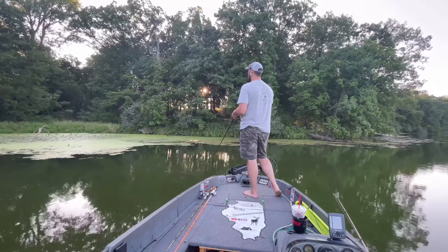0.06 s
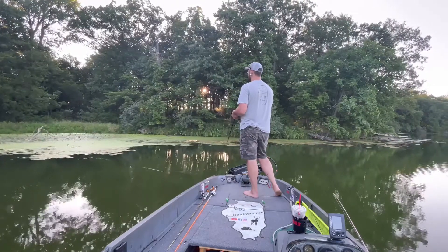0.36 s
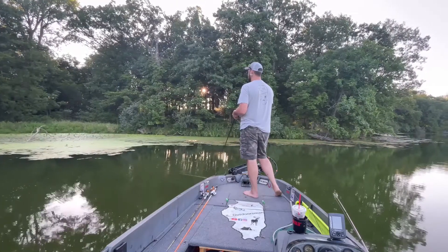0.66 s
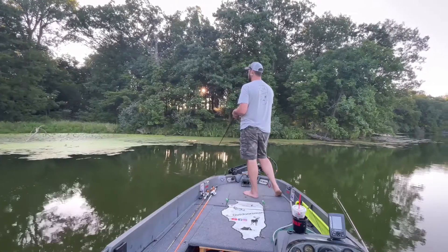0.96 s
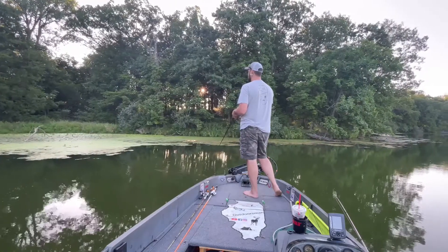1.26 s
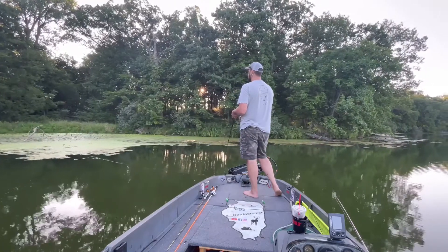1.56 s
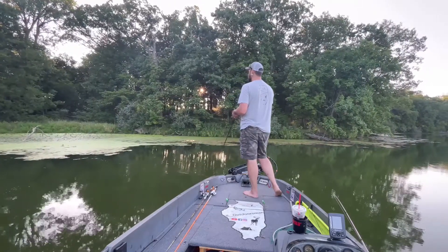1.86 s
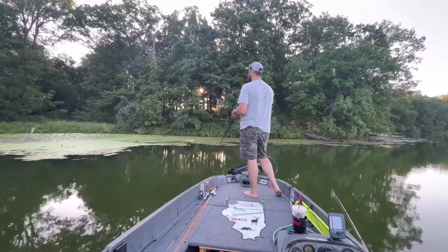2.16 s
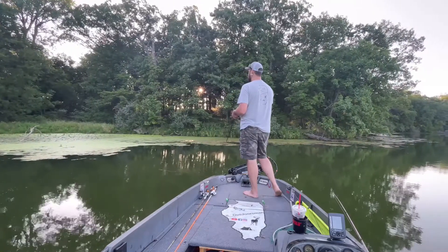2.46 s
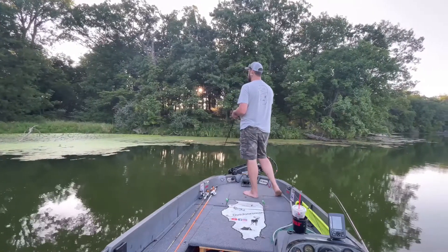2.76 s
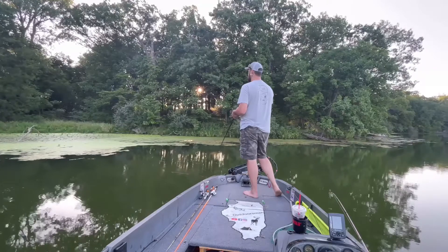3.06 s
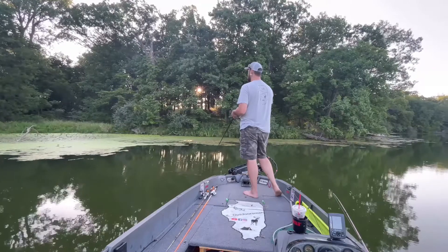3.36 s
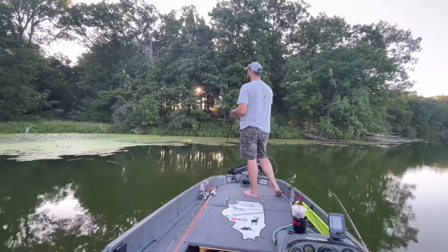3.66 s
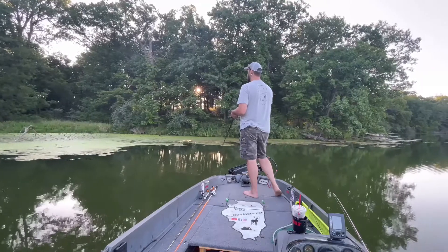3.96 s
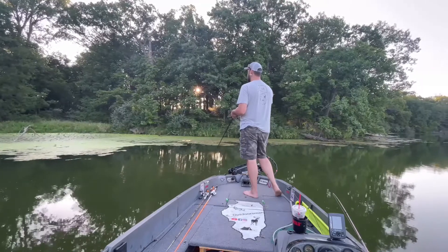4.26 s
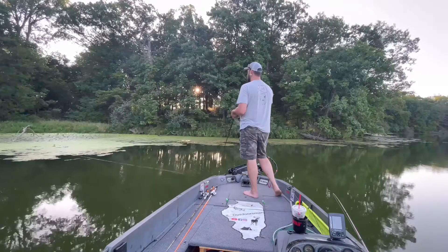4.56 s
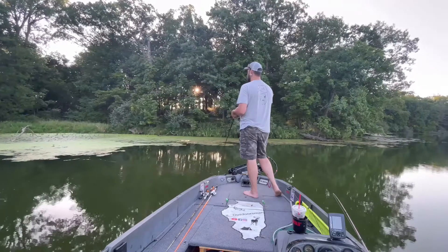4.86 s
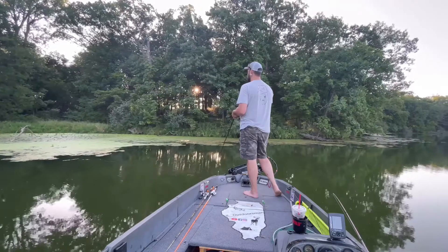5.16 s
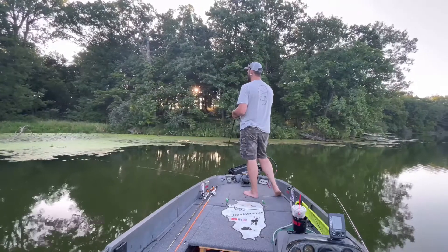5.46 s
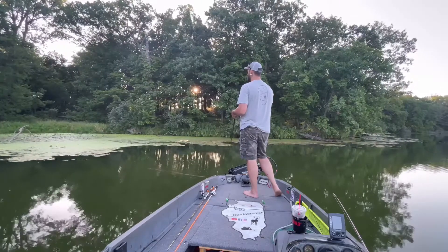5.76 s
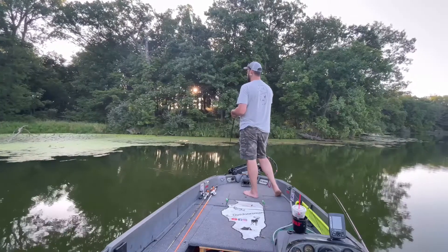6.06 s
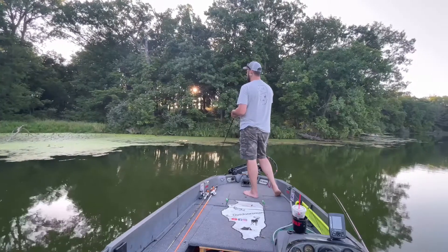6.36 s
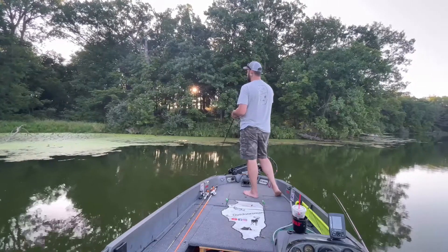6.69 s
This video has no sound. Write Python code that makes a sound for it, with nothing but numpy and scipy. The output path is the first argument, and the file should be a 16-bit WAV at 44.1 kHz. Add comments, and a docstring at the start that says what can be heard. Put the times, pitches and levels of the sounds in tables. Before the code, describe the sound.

Birds whistle over a high insect drone and faint far motor hum, while a fishing reel winds and clicks close by.

```python
"""Fishing on a summer evening

Under a soft rumble of air, a far motor hums across the lake and low hoots sound. Insects drone in
the trees, one cricket chirps evenly, and birds whistle from the wooded shore, which echoes them.
Close by in the boat, an angler winds his reel in short turns: gear teeth and line rasp, the ratchet
ticks and the tackle clicks."""
import sys
import numpy as np
from scipy import signal
from scipy.fft import rfft, irfft
from scipy.io import wavfile
from scipy.ndimage import uniform_filter1d

SR = 44100
rng = np.random.default_rng(int(sys.argv[2]) if len(sys.argv) > 2 else 0)


def digitize_waveform(pressure):
    """Quantize a signal to 16-bit integers and store it at the path in sys.argv[1].

    Rows of a 2-D input are taken as channels; values are limited to [-1, 1].
    """
    field = np.atleast_2d(pressure).T
    bounded = np.clip(field, -1, 1)
    quanta = np.round(bounded * 32767).astype(np.int16)
    wavfile.write(sys.argv[1], SR, quanta)


N = 305596
TIME = np.arange(N) / SR


def gain_of(db):
    """Decibels to amplitude."""
    return 10 ** (np.asarray(db) / 20)


def unit_rms(x):
    """Scales to an rms of one."""
    return x / np.sqrt(np.mean(x ** 2) + 1e-20)


def eq_gain(curve, hz):
    """The gain of an EQ curve at hz, read on a log-frequency axis."""
    freq_hz, level_db = np.transpose(curve)
    return gain_of(np.interp(np.log(hz + 1), np.log(freq_hz + 1), level_db))


def add(mix, start_s, sound):
    """Lays a sound into the mix, no earlier than time zero."""
    part = mix[max(round(start_s * SR), 0):][:len(sound)]
    part += sound[:len(part)]


def coloured(x, gain):
    """Filters x by a gain that is a function of frequency."""
    return irfft(rfft(x) * gain(np.fft.rfftfreq(len(x), 1 / SR)), len(x))


def noise(gain):
    """Noise of rms one with the given spectrum."""
    return unit_rms(coloured(rng.standard_normal(N), gain))


def drift(rate_hz):
    """A random modulator, mostly slower than rate_hz."""
    return noise(lambda f: np.exp(-(f / rate_hz) ** 2))


def bell(f, hz, width):
    """A band around hz, half the power at the edges of its width."""
    return 2 ** (-2 * ((f - hz) / width) ** 2)


def shore(dry, t60_s, wet_db, predelay_s=0.019, echoes_per_s=2000):
    """Trunks and leaves scatter a sound into many late, weak echoes."""
    t = np.arange(SR) / SR
    echoes = rng.standard_normal(SR) * (rng.random(SR) < echoes_per_s / SR)
    echoes *= (t > predelay_s) * gain_of(-60 * t / t60_s)
    return dry + gain_of(wet_db) * signal.fftconvolve(dry, echoes / np.linalg.norm(echoes))[:N]


# Tone of the air over the lake: freq_hz, gain_db
AIR_EQ = [(12, -41), (20, -4), (50, -4), (80, 4), (97, -2.5), (122, -1.5), (142, -7.5), (200, -6.5),
          (232, -12.5), (275, -13.5), (400, -17.5), (500, -19), (717, -23.5), (1220, -32.5), (3150, -38),
          (4800, -38), (6000, -32.5), (7930, -39.5), (16000, -41)]


def air(level_db=-50, sway_db=1.1, sway_hz=1.85, rise_db_per_s=0.13, crossover_hz=300):
    """A low rumble that sways and slowly grows, under a smooth hiss."""
    bed = gain_of(level_db) * noise(lambda f: eq_gain(AIR_EQ, f))
    rumble = coloured(bed, lambda f: 1 / (1 + (f / crossover_hz) ** 4))
    hiss = bed - rumble
    swell_db = rise_db_per_s * (TIME - TIME.mean()) + sway_db * drift(sway_hz)
    return rumble * gain_of(swell_db) + hiss


def whine(pitch_hz=12023, level_db=-84, waver_db=1.2):
    """A thin high tone whose level wavers a little."""
    return gain_of(level_db + waver_db * drift(4)) * np.sqrt(2) * np.sin(2 * np.pi * pitch_hz * TIME)


# Faint far drones: start_s, end_s, pitch_hz, width_hz, level_db
DRONES = [(0.6, 3.6, 116, 2.6, -60.5), (2.5, 3.7, 129, 5.5, -59.5), (-0.5, 4.2, 217, 2.9, -62.5),
          (-0.5, 8, 163, 5.8, -63), (-2.5, 8, 176, 7.9, -63), (0.5, 4.2, 320, 6.1, -73.5)]


def drones():
    """Narrow bands of low noise hum in the distance, each fading in and out."""
    out = np.zeros(N)
    for start_s, end_s, pitch_hz, width_hz, level_db in DRONES:
        along = np.clip((TIME - start_s) / (end_s - start_s), 0, 1)
        fade = np.sqrt(abs(np.sin(np.pi * along)))
        out += gain_of(level_db) * fade * noise(lambda f: bell(f, pitch_hz, width_hz))
    return out


# Swells where the motor carries better across the water: peak_s, half_length_s, level_db
MOTOR_SWELLS = [(.8, .3, -56.5), (3.18, 0.3, -50.5), (5.33, 0.1, -50.5), (5.853, 0.28, -57),
                (6.62, .35, -51)]


def motor(pitch_hz=108.4, floor_db=-61, slows_at_s=5.4, sag_hz_per_s=3.6, waver_hz=1.44, waver_db=1.0):
    """The firing tone of a far motor runs steadily, then sinks as the motor slows."""
    hz = pitch_hz - sag_hz_per_s * np.maximum(TIME - slows_at_s, 0)
    cycles = np.cumsum(hz + waver_hz * drift(4.43)) / SR
    power = gain_of(floor_db) ** 2
    for peak_s, half_length_s, level_db in MOTOR_SWELLS:
        power += gain_of(level_db) ** 2 * np.exp(-((TIME - peak_s) / half_length_s) ** 2)
    return np.sqrt(2 * power) * gain_of(-waver_db * drift(5.3)) * np.sin(2 * np.pi * cycles)


# Runs of soft, far hoots: start_s, count, period_s, pitch_hz, level_db, fade_db_per_hoot
HOOT_RUNS = [(-.045, 8, .195, 300, -56, 0.65), (3.38, 6, .127, 313.4, -57.5, 0.6)]


def hoots(detune_hz=1.35, duty=.78):
    """Evenly spaced hoots, each a plain tone that swells and fades, softer than the last."""
    out = np.zeros(N)
    for start_s, count, period_s, pitch_hz, level_db, fade_db in HOOT_RUNS:
        t = np.arange(0, duty * period_s, 1 / SR)
        envelope = np.sin(np.pi * t / t[-1])
        for k in range(count):
            hz = pitch_hz + detune_hz * rng.standard_normal()
            tone = np.sqrt(2) * np.sin(2 * np.pi * (hz * t + rng.random()))
            add(out, start_s + k * period_s, gain_of(level_db - k * fade_db) * envelope * tone)
    return out


# Bands of the insect chorus: pitch_hz, width_hz, gain_db
INSECT_BANDS = [(5325, 406, -2), (5580, 270, 2.5), (5850, 190, 0), (6070, 220, 0.5), (6360, 250, 1.5),
                (6810, 270, -1.5), (6720, 130, -5.5), (6840, 210, -10), (7285, 92, -2.5),
                (7700, 480, -19.5)]


def insects(level_db=-64, flutter_db=.5):
    """Many wings blur into one narrow band for each kind of insect."""
    def spectrum(f):
        return np.sqrt(sum((gain_of(db) * bell(f, hz, width)) ** 2 for hz, width, db in INSECT_BANDS))
    return noise(spectrum) * gain_of(level_db + flutter_db * drift(40))


# Fader curve of the cricket: time_s, level_db
CRICKET_FADER = [(0, -69), (1.5, -70.5), (3, -67.7), (4.6, -65.3), (6.93, -66.7)]


def cricket(first_s=.118, period_s=.18965, length_s=0.05, jitter_s=0.0035, top_hz=6835, bend_hz=210):
    """Even chirps, each a tone that slides up to the wing's pitch and sags a little."""
    out, along = np.zeros(N), np.linspace(0, 1, round(length_s * SR))
    bend = bend_hz * ((along - .65) / 0.683) ** 2
    for centre_s in np.arange(first_s, N / SR, period_s):
        hz = top_hz + 15 * rng.standard_normal() - bend
        chirp = np.sin(np.pi * along) * np.sin(2 * np.pi * np.cumsum(hz) / SR)
        add(out, centre_s - length_s / 2 + jitter_s * rng.standard_normal(), chirp)
    return np.sqrt(2) * out * gain_of(np.interp(TIME, *np.transpose(CRICKET_FADER)))


# Bouts of the clear two-note song: start_s, repeats, level_db, shift_hz
TWO_NOTE_BOUTS = [(2.501, 3, -67.5, 29.2), (5.505, 4, -67, 11.4)]


def two_note_song(period_s=.243, slowing_s=.0045, link_s=.138, link_lag_s=.006,
                  link_db=-2.0, swell_db=2.0, sag_hz=55):
    """A pair of notes slows, grows louder and sags in pitch: start_s, syllable, level_db, shift_hz."""
    notes = []
    for start_s, repeats, level_db, shift_hz in TWO_NOTE_BOUTS:
        for k in range(repeats):
            along = k / (repeats - 1)
            hook_s = start_s + period_s * k + slowing_s * k ** 2
            db, shift = level_db + swell_db * along, shift_hz - sag_hz * along ** 2
            notes.append((hook_s, "hook", db, shift))
            notes.append((hook_s + link_s + link_lag_s * k, "link", db + link_db, shift))
    return notes


def rolling_song(start_s=2.128, count=9, period_s=.2705, hurry_s=.00082, low_s=.16,
                 dip_db=-67.5, low_db=-72, ends_db=-2.0):
    """Two notes alternate, hurrying a little, loudest mid-song: start_s, syllable, level_db, shift_hz."""
    notes = []
    for k in range(count):
        dip_s = start_s + period_s * k - hurry_s * k ** 2
        arch_db = ends_db * (2 * k / (count - 1) - 1) ** 2
        notes += [(dip_s, "dip", dip_db + arch_db, 0), (dip_s + low_s, "low", low_db + arch_db, 0)]
    return notes


# Pitch contour of each whistled syllable, by name: time_s, pitch_hz
SYLLABLES = { "hook": [(0, 2845), (.08, 2850), (.104, 2760), (.138, 2336)], "link": [(0, 2680), (.02, 2830),
             (.05, 2865), (.075, 2833)], "low": [(0, 1848), (.032, 1710), (.048, 1570)], "dip": [(0, 2258),
             (.022, 1970), (.034, 2840), (.048, 2920), (.066, 2630)], "slur": [(0, 3480), (.014, 3850),
             (.04, 3540), (.078, 3530)], "arch": [(0, 4200), (.025, 4570), (.045, 4560), (.065, 4250)],
             "rise": [(0, 2800), (.015, 3200), (.036, 4450)], "fall": [(0, 4500), (.022, 3600),
             (.068, 2300), (.09, 2520), (.14, 2380)], "drop": [(0, 4220), (.015, 4100), (.06, 3420)],
             "flute": [(0, 1840), (.025, 1978), (.11, 1986)], "pee": [(0, 4200), (.045, 4550), (.17, 4600)],
             "ah": [(0, 4100), (.045, 3760), (.14, 3620)], "wee": [(0, 3620), (.17, 4080), (.27, 4300),
             (.36, 4370)], "long": [(0, 4060), (.13, 4290), (.24, 4380), (.35, 4260)], "thin": [(0, 4200),
             (.05, 4300), (.11, 4330)], }
# Fast pitch shake of the burred syllables, by name: depth_hz
BURR_DEPTHS = {"thin": 120, "pee": 140, "ah": 80, "wee": 76, "long": 33}
# Single calls of the other birds: start_s, syllable, level_db
BIRD_CALLS = [(0, "thin", -70), (1.088, "rise", -65.5), (1.125, "fall", -72), (1.362, "rise", -61),
              (2.202, "slur", -69), (2.725, "arch", -73), (3.19, "long", -76.5), (4.49, "slur", -72),
              (5.131, "pee", -69.5), (5.36, "ah", -72), (5.53, "wee", -70.5), (6.174, "flute", -64),
              (6.422, "drop", -69.5)]


def birds(quaver=0.0047, flutter_db=2.0, glide_hz_per_s=24000, attack_share=0.17, release_share=0.19):
    """Each whistle swells, follows its contour and fades, thinning in fast glides; some have a burr."""
    out = np.zeros(N)
    wobble, flutter, shake = 1 + quaver * drift(130), gain_of(flutter_db * drift(70)), drift(260)
    notes = two_note_song() + rolling_song() + [(*call, 0) for call in BIRD_CALLS]
    for start_s, syllable, level_db, shift_hz in notes:
        time_s, pitch_hz = np.transpose(SYLLABLES[syllable])
        t = np.arange(0, time_s[-1], 1 / SR)
        contour = uniform_filter1d(np.interp(t, time_s, pitch_hz + shift_hz), size=300)
        burr = BURR_DEPTHS.get(syllable, 0) * np.interp(start_s + t, TIME, shake)
        hz = contour * np.interp(start_s + t, TIME, wobble) + burr
        along = t / t[-1]
        envelope = np.sqrt(np.clip(np.minimum(along / attack_share, (1 - along) / release_share), 0, 1))
        envelope /= np.hypot(1, np.gradient(contour) * SR / glide_hz_per_s)  # 3 dB down at this glide
        whistle = np.sqrt(2) * np.sin(2 * np.pi * np.cumsum(hz) / SR)
        add(out, start_s, gain_of(level_db) * envelope * whistle)
    return out * flutter


# Runs of the reel's ratchet: start_s, ticks, first_peak_db
RATCHET_RUNS = [(.803, 3, -54), (1.443, 1, -46), (3.018, 1, -54), (5.922, 4, -45.5)]


def ratchet(gap_s=0.024, fade_db=4, pitch_hz=4610, width_hz=200):
    """The pawl ticks at an even pace, each tick weaker: start_s, peak_db, pitch_hz, width_hz."""
    return [(start_s + k * gap_s, first_peak_db - k * fade_db, pitch_hz, width_hz)
            for start_s, ticks, first_peak_db in RATCHET_RUNS for k in range(ticks)]


# Sharp clicks of the tackle: start_s, peak_db, pitch_hz, width_hz
TACKLE_CLICKS = [(.404, -40, 4200, 900), (.431, -41.5, 3060, 1110), (.496, -54, 2480, 150),
                 (.767, -42, 3300, 1800), (1.424, -42, 2480, 1810), (1.441, -41.5, 3000, 1600),
                 (1.445, -41, 2700, 1400), (1.464, -47.5, 1750, 400), (1.602, -51, 2300, 700),
                 (1.876, -40, 2300, 1200), (1.879, -37, 3900, 1400), (1.891, -40, 2310, 1200),
                 (1.935, -47, 1900, 1000), (1.964, -45, 2300, 1300), (2.582, -51, 3400, 900),
                 (3.731, -45, 3300, 2500), (4.586, -37, 3580, 1200), (5.451, -42.5, 3500, 2000),
                 (5.542, -48, 1800, 900), (5.925, -38, 2000, 1100), (6.805, -49, 3020, 700),
                 (6.897, -39, 3200, 2500)]


def tackle(rattle_db=-24, rattle_t60_s=0.065):
    """Each click and ratchet tick rings briefly at its own pitch and leaves a tiny rattle."""
    out, t = np.zeros(N), np.arange(2048) / SR
    for start_s, peak_db, pitch_hz, width_hz in TACKLE_CLICKS + ratchet():
        age = 2 * np.pi * width_hz * t  # a wider band dies sooner
        ring = age * np.exp(1 - age) * np.sin(2 * np.pi * pitch_hz * t)
        strike = gain_of(rattle_db - 60 * t / rattle_t60_s) * rng.standard_normal(len(t)) / 2
        strike[0] = 1  # the hit itself, ahead of the rattle
        click = signal.fftconvolve(strike, ring)
        add(out, start_s, gain_of(peak_db) * click / abs(click).max())
    return out


# Tone of the reel's rasp: freq_hz, gain_db
RASP_EQ = [(300, -6), (800, -2.5), (1250, -6.5), (1520, -0.5), (1730, 5), (2050, -5), (2850, -1.5),
           (3500, -7.5), (4200, -14.5), (4650, -9), (5300, -18), (9000, -30), (16000, -34)]
# Turns of the handle, loudest when fastest: peak_s, run_up_s, run_down_s, level_db, bright_db
REEL_TURNS = [(.335, .03, 0.11, -60.5, 1), (.74, 0.13, 0.22, -57, 0), (.92, .12, 0.15, -62, -10),
              (1.44, .08, 0.1, -65.5, 5), (1.89, 0.12, 0.19, -56, -1), (2.97, 0.13, 0.16, -55.5, 0.5),
              (3.15, 0.17, 0.15, -66.5, -2), (4.035, 0.14, 0.19, -60, -2), (4.17, .1, 0.15, -64.5, -7),
              (4.558, 0.044, .04, -68, 3), (5.43, 0.31, 0.11, -68, -1), (5.55, 0.054, 0.18, -64, 0),
              (5.82, 0.13, 0.24, -64.5, 0), (5.925, 0.09, .14, -58, 2.5), (6.19, 0.055, 0.25, -67.5, -2),
              (6.39, 0.37, 0.11, -67.5, -1), (6.885, 0.096, 0.051, -60.5, 2)]


def reel(gain_db=3.5, ticks_per_s=850, spread_db=2.5, hiss_mix=0.47, clump_db=2.7,
         crossover_hz=3300, run_range_db=19.5, roundness=1.09):
    """Gear teeth and line make dense clumps of ticks that ring in the reel; each turn runs up and down."""
    ticks = (rng.random(N) < ticks_per_s / SR) * rng.choice([-1, 1], N)
    ticks = ticks * gain_of(spread_db * np.minimum(rng.exponential(1, N), 3))
    grit = unit_rms(ticks) + hiss_mix * rng.standard_normal(N)
    clumps = gain_of(clump_db * np.tanh(noise(lambda f: bell(f, hz=64, width=76))))
    rasp = unit_rms(coloured(grit * clumps, lambda f: eq_gain(RASP_EQ, f)))
    body = coloured(rasp, lambda f: 1 / (1 + (f / crossover_hz) ** 8))
    treble = rasp - body
    body_gain, treble_gain = np.zeros(N), np.zeros(N)
    for peak_s, run_up_s, run_down_s, level_db, bright_db in REEL_TURNS:
        from_peak = np.maximum((peak_s - TIME) / run_up_s, (TIME - peak_s) / run_down_s)
        swell = gain_of(level_db - run_range_db * from_peak ** roundness)  # 1: pointed top, 2: round
        body_gain = np.maximum(body_gain, swell)
        treble_gain = np.maximum(treble_gain, swell * gain_of(bright_db))
    return gain_of(gain_db) * (body * body_gain + treble * treble_gain)


def scene():
    """A mono mix: calls echo from the shore over the evening bed, with reel and tackle dry and close."""
    calls = gain_of(-0.15) * shore(birds(), t60_s=0.96, wet_db=-4.5)
    calls += shore(cricket(), t60_s=0.54, wet_db=-16)
    calls += shore(hoots(), t60_s=1.0, wet_db=-11)
    bed = air() + motor() + drones() + insects()
    angler = reel() + tackle()
    return (bed + whine() + calls + angler)[None]


def record(dry, cutoff_hz=15900):
    """A steep low-pass takes off the highest treble."""
    low_pass = signal.firwin(801, cutoff_hz, window=("kaiser", 9), fs=SR)
    return signal.oaconvolve(dry, low_pass[None], "same")


dry = scene()
out = record(dry)
digitize_waveform(out)
```